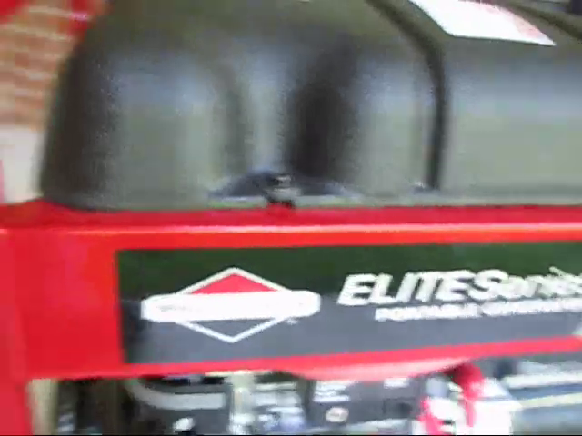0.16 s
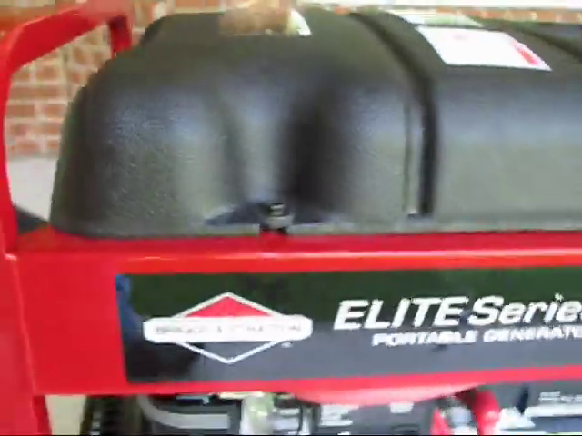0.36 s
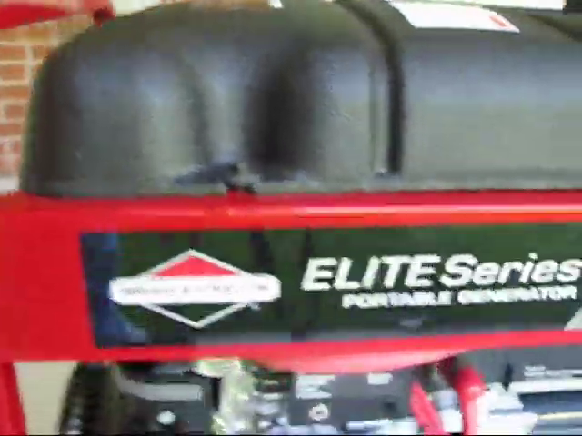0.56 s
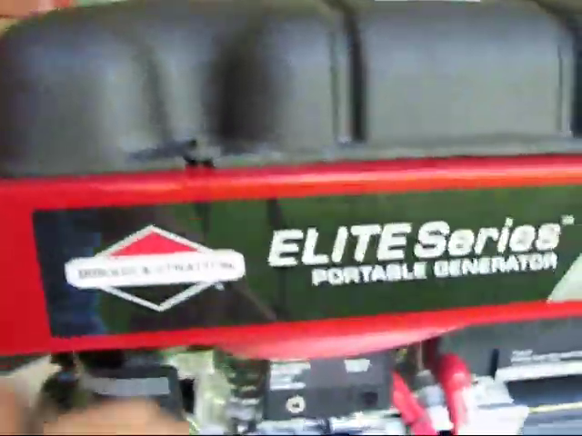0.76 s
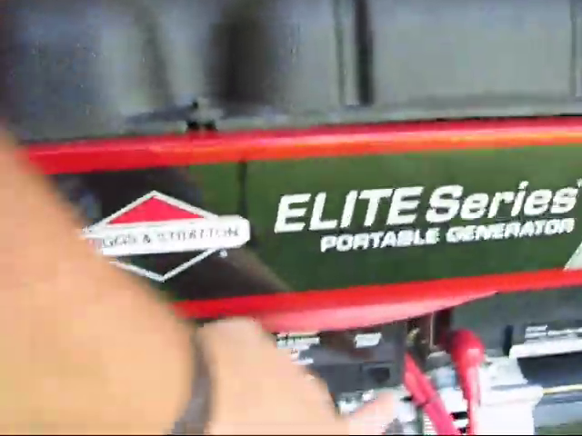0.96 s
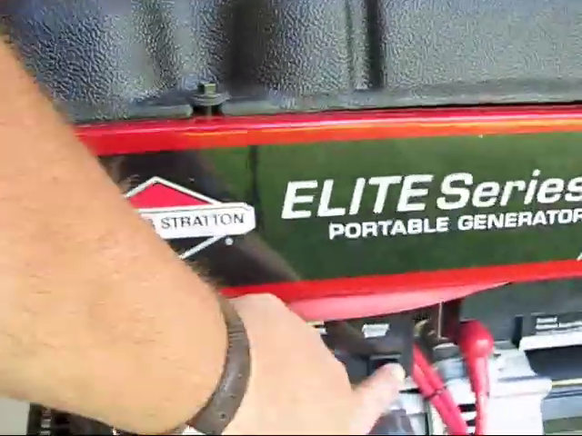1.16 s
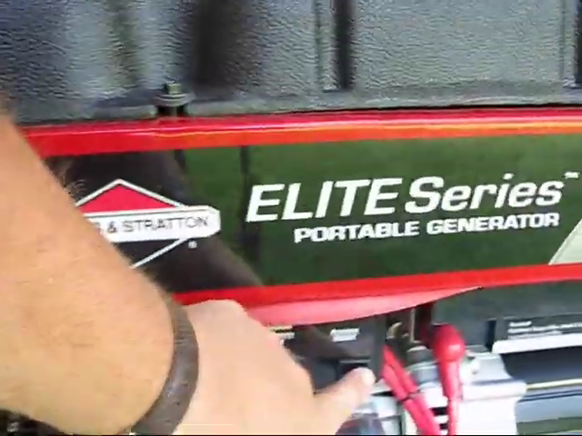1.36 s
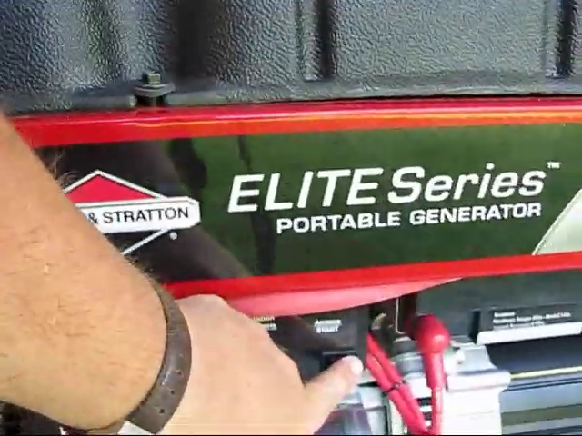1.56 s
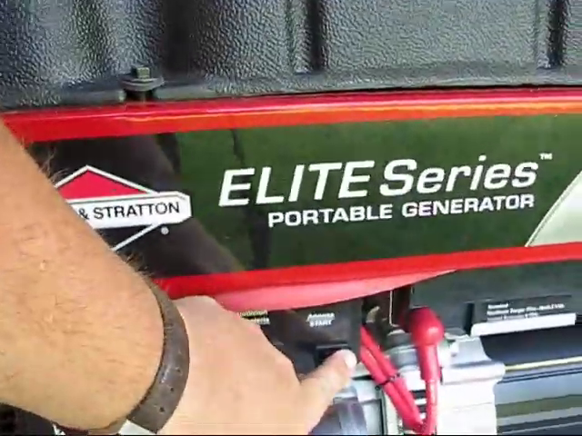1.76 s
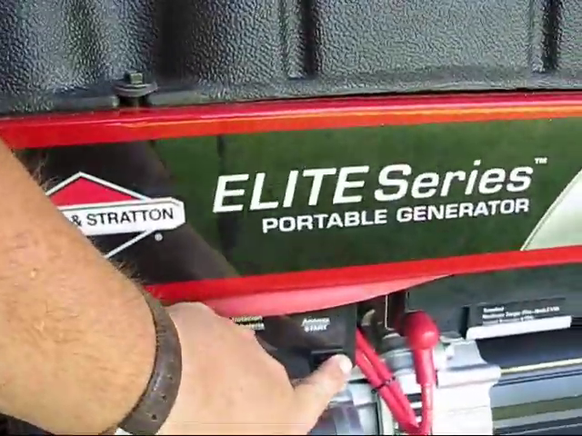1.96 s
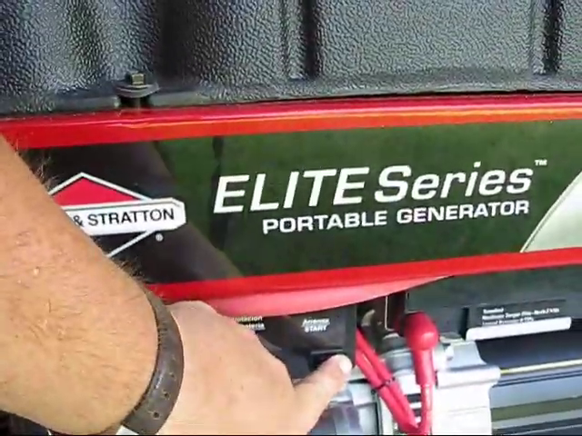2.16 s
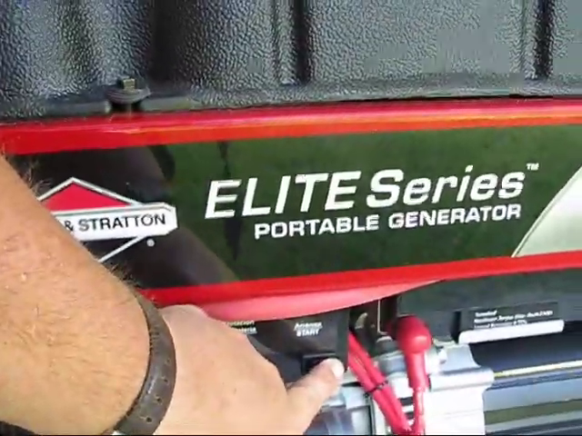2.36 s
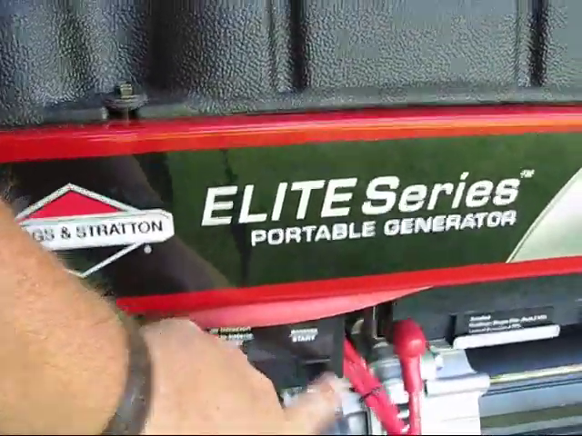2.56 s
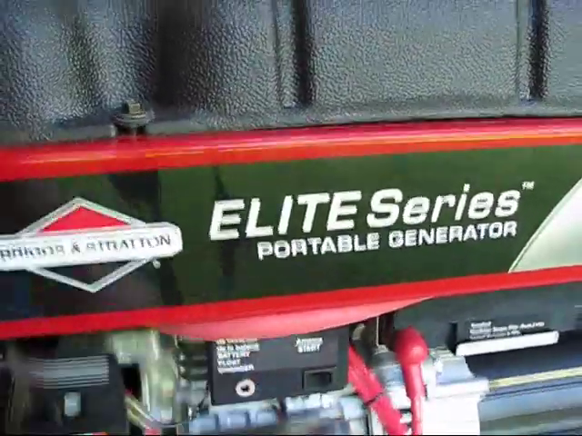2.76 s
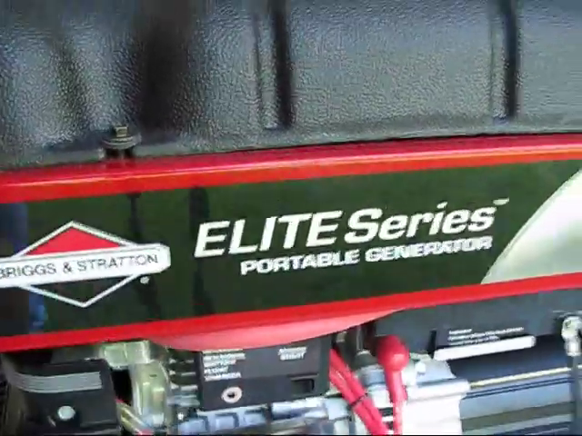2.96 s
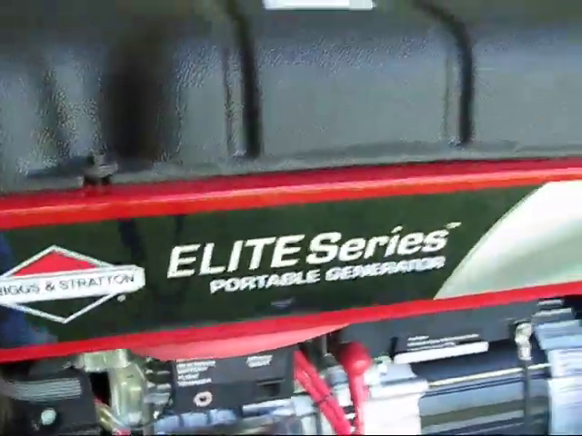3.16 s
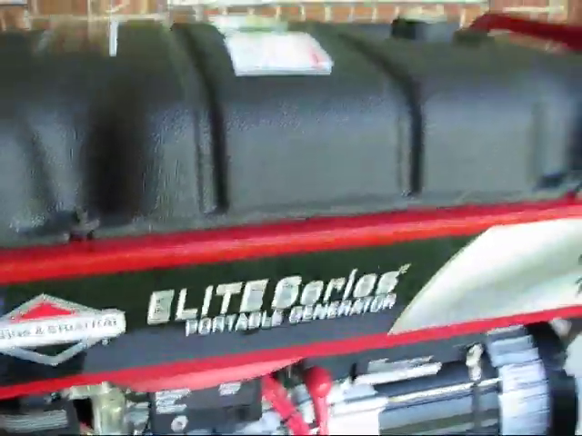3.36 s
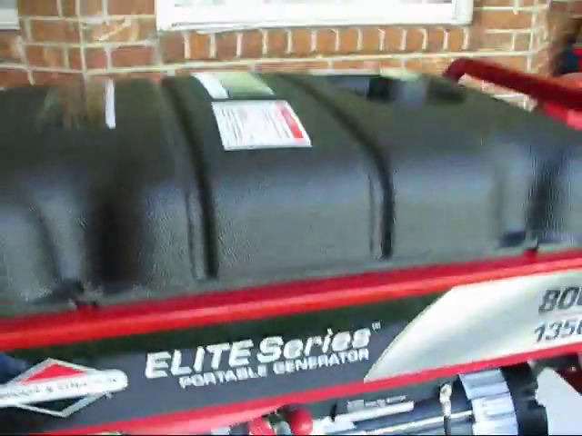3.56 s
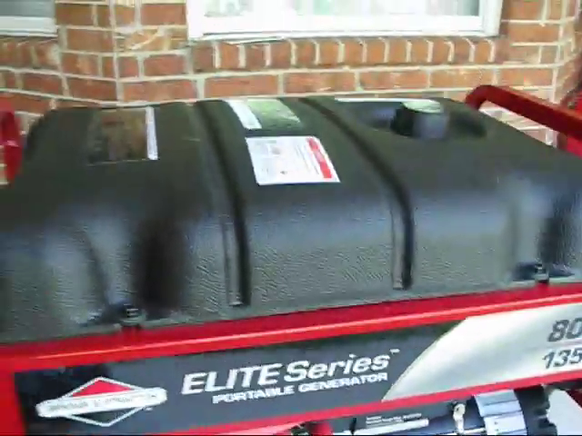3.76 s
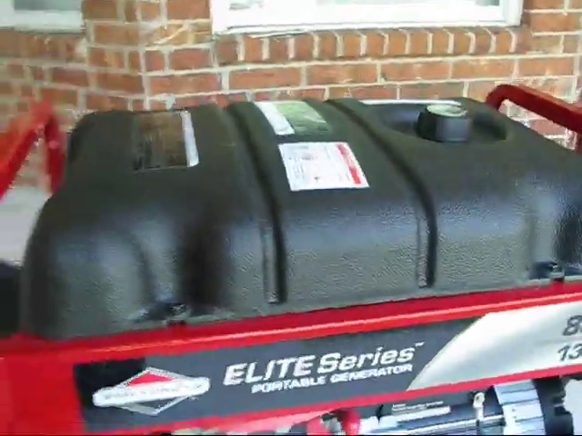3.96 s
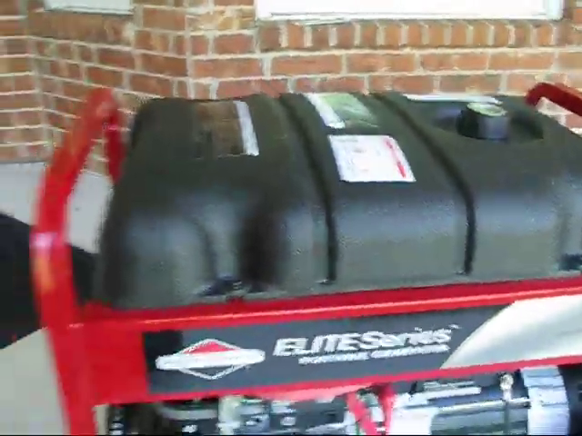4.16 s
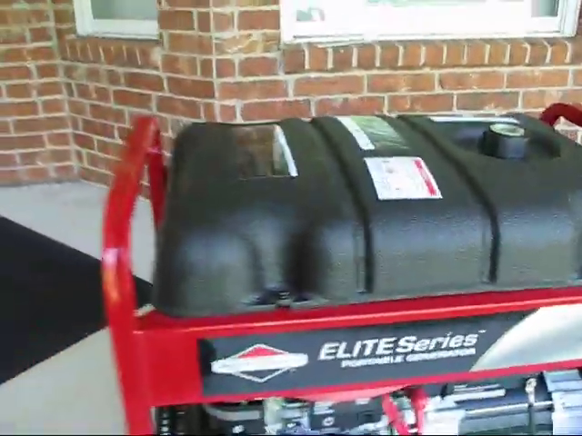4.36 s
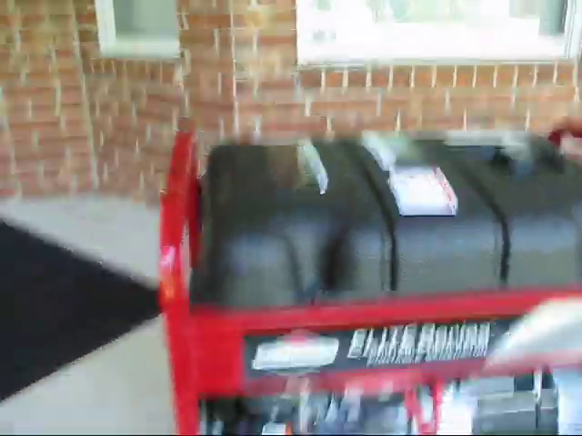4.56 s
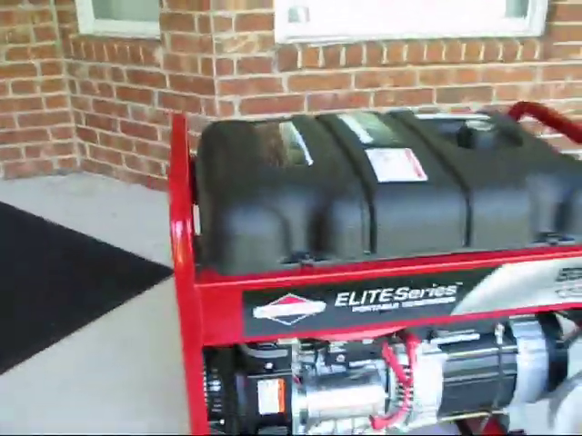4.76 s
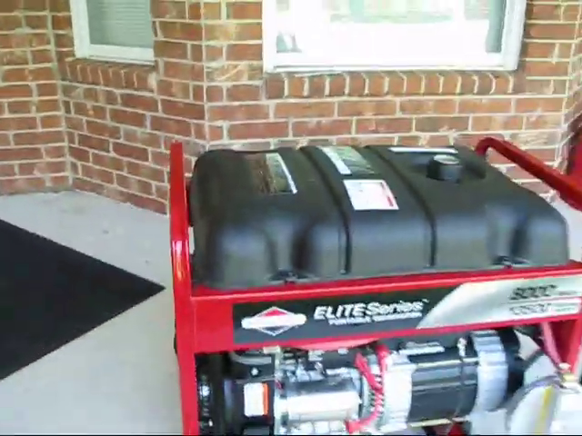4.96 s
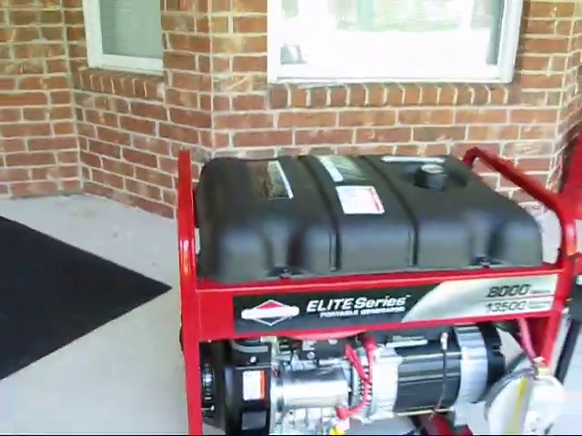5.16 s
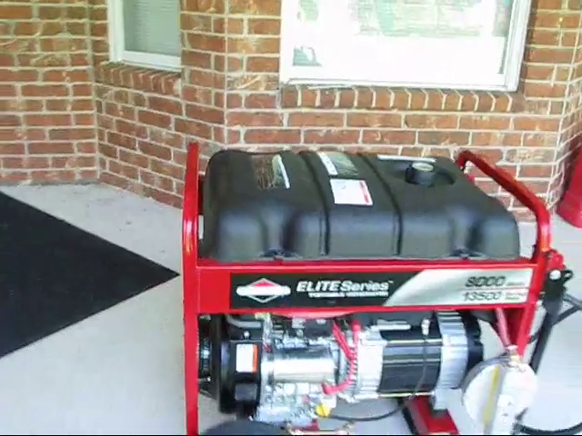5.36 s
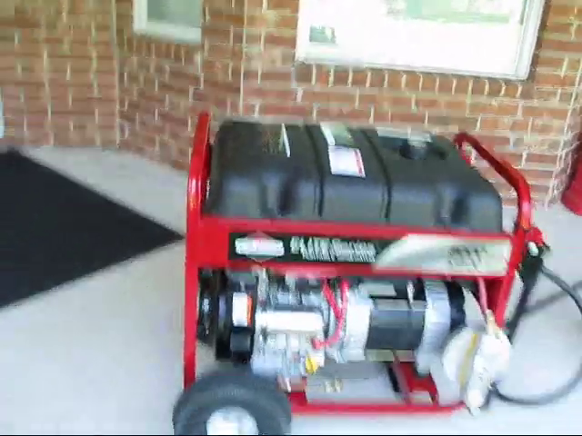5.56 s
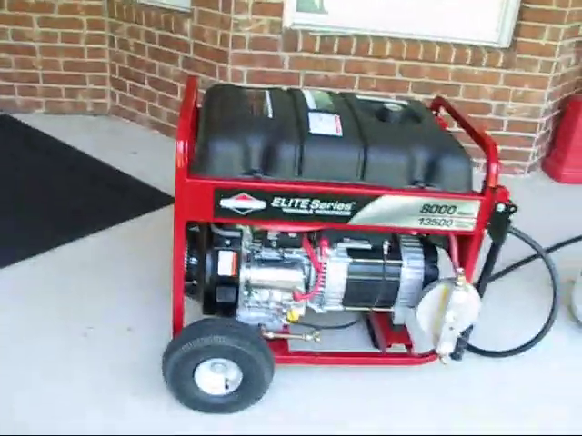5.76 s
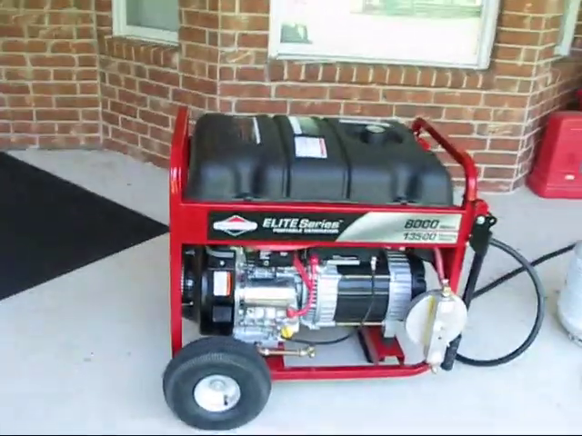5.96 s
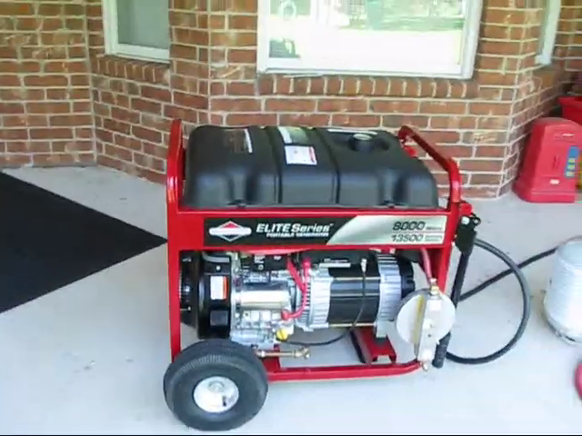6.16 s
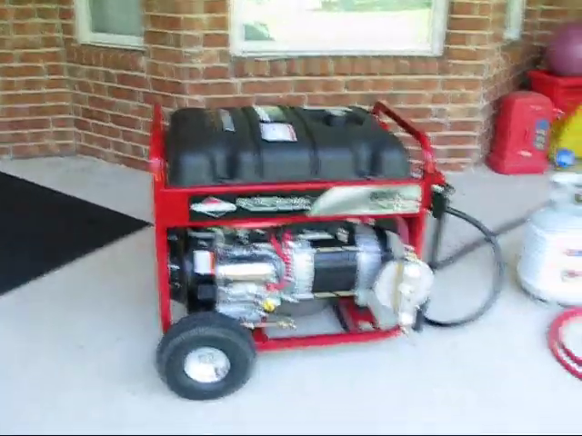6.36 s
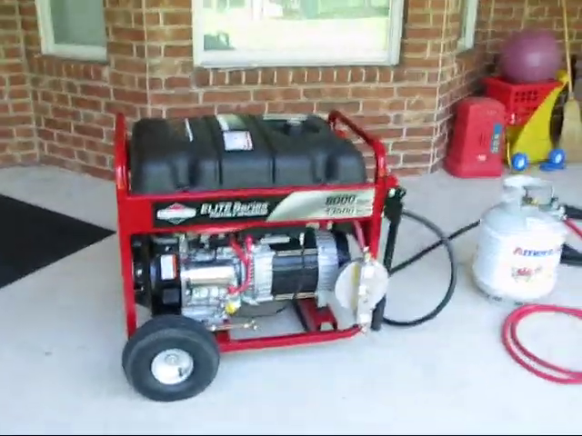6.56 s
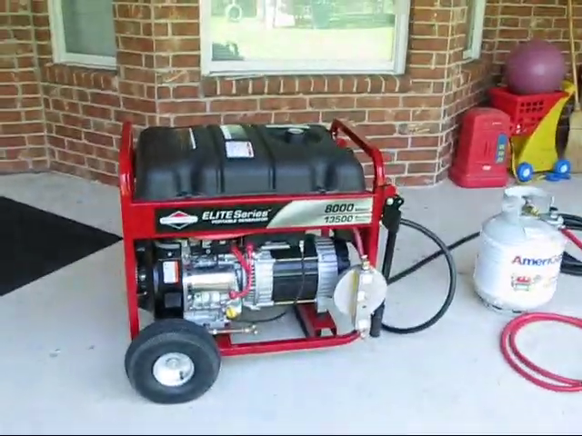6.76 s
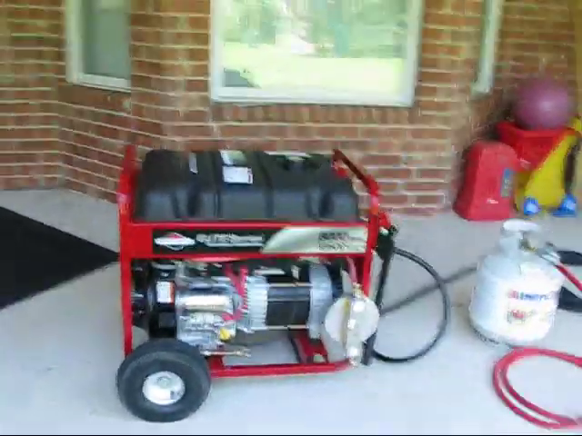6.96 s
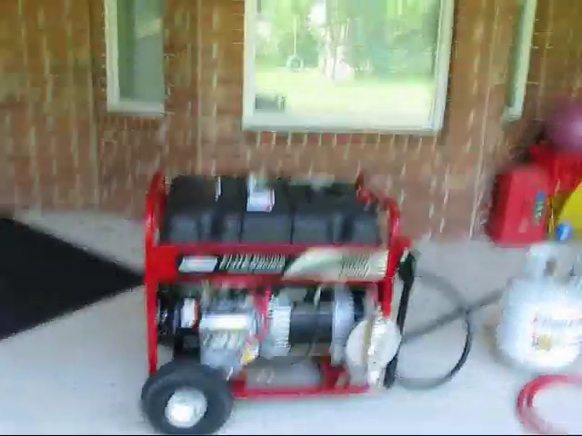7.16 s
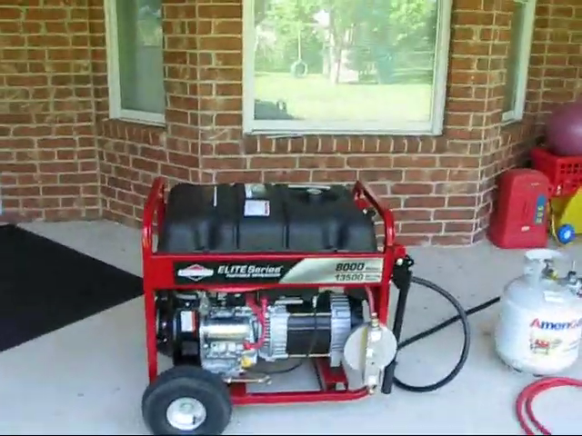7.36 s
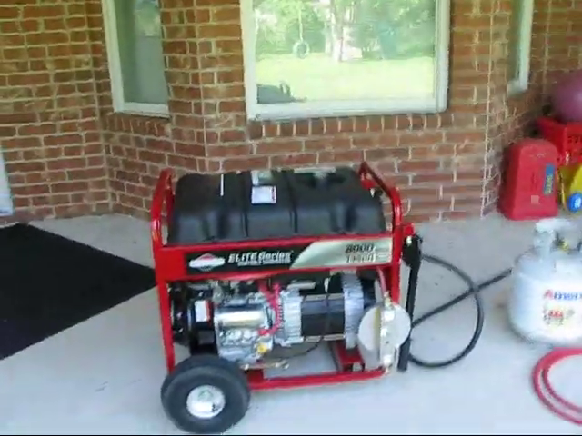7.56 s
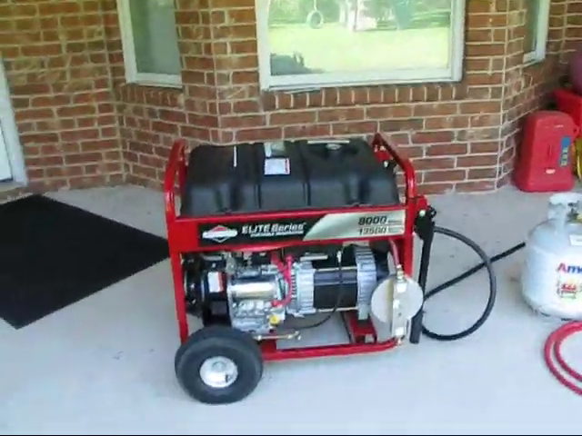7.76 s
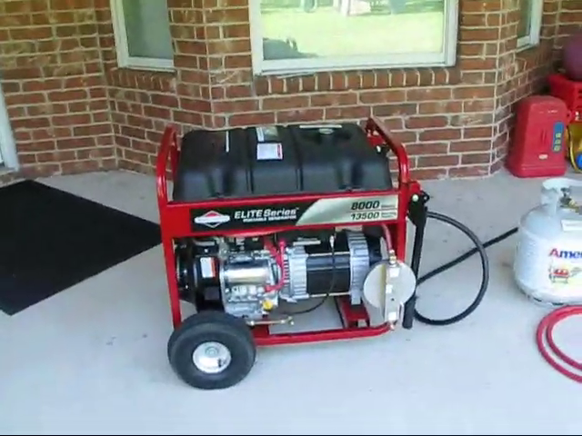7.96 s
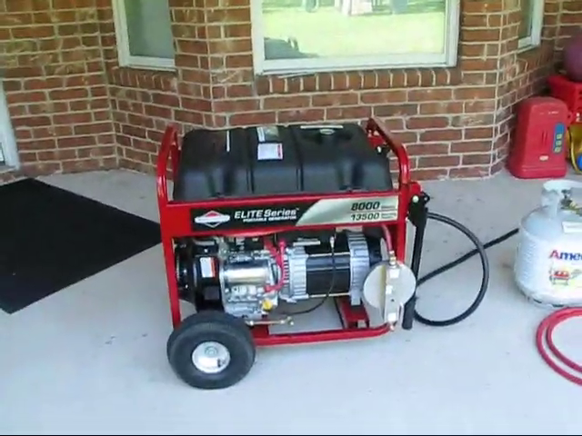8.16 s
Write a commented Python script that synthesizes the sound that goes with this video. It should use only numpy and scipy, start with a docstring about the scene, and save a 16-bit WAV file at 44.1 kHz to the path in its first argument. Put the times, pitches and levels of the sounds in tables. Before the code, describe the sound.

For the first 1.5 seconds there is only low outdoor rumble, faint hum and small ticks near 0.2 and 0.6-0.7 s. Around 1.46 s a light knock precedes a very loud, bright metallic slam at 1.55 s. The starter motor chatters, then its gear whine sweeps upward, gritty and ringing, with low cylinder chuffs, until released near 2.4 s. At about 2.56 s the petrol engine catches, its heavy puffs and casing rattle accelerating in a smooth pitch rise until about 3.4 s. It then settles into a constant, fast drone with valve clatter, fan rush and faint whirr. Low stumbling thumps come at 3.6, 4.0 and 5.5 s, with smaller ones after 6.4 s. Near 3.8 s a hollow tank resonance swells; from 4.2 to 5.6 s the close microphone retreats, with a short brick-porch echo. The engine keeps running to the end at 8 s.

```python
"""Petrol generator start-up on a brick porch

Over a rumbling yard and a faint hum, ticks lead to a solenoid slam built from short ringing bursts.
Starter gears whine upward as phase-driven tooth tones, with noise for chatter and grinding.
A single-cylinder engine catches and runs up to governed speed: filtered puffs merge into a drone of
cycle harmonics over clatter and rattle. It stumbles now and then while the listener backs away."""
import sys
import numpy as np
from scipy import signal
from scipy.fft import rfft, irfft
from scipy.io import wavfile
from scipy.ndimage import uniform_filter1d

SR = 44100
rng = np.random.default_rng(int(sys.argv[2]) if len(sys.argv) > 2 else 0)


def int16_out(signal):
    """Quantize to a 16-bit WAV file."""
    q = np.round(np.clip(np.atleast_2d(signal).T, -1, 1) * 32767)
    wavfile.write(sys.argv[1], SR, q.astype(np.int16))


N = 361619
T = np.arange(N) / SR  # time [s]
TOP_HZ = 15800  # upper limit of the sound

# noise colour of the outdoor rumble: (frequency [Hz], relative level [dB])
YARD_COLOUR = [(15, -27), (25, -12), (119, -9), (204, -14.5), (233, -11.5), (267, -18.5), (297, -17),
               (399, -23.5), (457, -20), (2300, -33), (15500, -57)]
YARD_DB = -34.5  # rumble rms before its swells and the later fade
# hum of a distant machine, before the later fade: (frequency [Hz], rms level [dB])
HUM_TONES = [(64.6, -44), (236.9, -39), (2116, -65)]

# handling ticks, start switch, then solenoid and pinion, before the porch:
# (time [s], peak level [dB], centre frequency [Hz], 60 dB decay time [s])
METAL_KNOCKS = [(0.196, -20, 1700, 0.024), (0.196, -30, 7500, .012), (.585, -38, 8000, 0.1),
                (0.6105, -16, 960, 0.012), (.699, -28.5, 2000, .04), (1.458, -24.5, 2920, .03),
                (1.48, -31, 2900, 0.054), (1.462, -21.5, 418, 0.18), (1.5333, -5.5, 6340, 0.054),
                (1.540, -6, 2520, 0.032), (1.5452, 3, 2300, 0.026), (1.557, -8.5, 6230, 0.078),
                (1.5578, -3.5, 2360, 0.099), (1.569, -6, 1110, .09)]

# starter motor: switched on, nears its free tooth rate ever more slowly, is released and coasts
CRANK_S, RELEASE_S, SPIN_UP_S = 1.54, 2.43, .41
FREE_TOOTH_HZ, COAST_HZ_PER_S = 1670, 1430
TEETH_PER_CYCLE = 198  # starter teeth passing in one engine cycle
# frame resonances that swell the gliding gear tone: (frequency [Hz], width [Hz], peak boost [dB])
FRAME_SWELLS = [(676, 54, 7), (1334, 19, 8)]
# starter housing resonances: (frequency [Hz], width [Hz], relative level [dB])
HOUSING_RINGS = [(1850, 310, 0.5), (2510, 220, -4), (2990, 160, -13), (3400, 140, 6.5), (3990, 150, -3),
                 (4350, 470, -7), (5600, 300, -13), (8460, 500, -11)]
# noise colour of grinding gears: (frequency [Hz], relative level [dB])
GRIND_COLOUR = [(250, -30), (700, -5), (1300, -14), (2500, -5.5), (5500, -10.5), (7000, -16), (11000, -17),
                (15000, -28)]

# chuffs of the cylinder while it is cranked: (share of the cycle [0-1], peak level [dB])
CRANK_CHUFFS = [(.335, -19), (0.662, -18)]
# colour of low gas thumps: (frequency [Hz], relative level [dB])
CRANKCASE_COLOUR = [(25, -28), (55, -13), (80, 8), (110, -7), (170, 0), (300, -10.5), (700, -39.5)]

# engine speed in four-stroke cycles per second: a steady run-up to the governed speed
CATCH_S, CATCH_HZ, RUN_UP_HZ_PER_S, GOVERNED_HZ = 2.563, 10.6, 26.2, 31.215
OVERSHOOT_HZ, OVERSHOOT_S = .5, .2  # peak excess, and its delay after the run-up
# throttle: load left at governed speed [0-1], bend of its closing, smoothing window [s]
IDLE_LOAD, THROTTLE_BEND, THROTTLE_S = 0.087, .6, 0.6
# the listener rises past the fuel tank, then walks back
PAST_TANK_S, PASSING_S = 3.77, 0.23
STEP_BACK_S, WALK_S = 4.21, 1.4  # start and duration

# gas puffs of one engine cycle: (share of the cycle [0-1], relative level [dB])
EXHAUST_PUFFS = [(0.221, -2.5), (0.524, -1.5), (0.879, -5)]
PUFF_SCATTER_DB = 1.2
# colour of the silenced puffs: (frequency [Hz], relative level [dB])
SILENCER_COLOUR = [(20, -14), (45, -5), (80, -2), (130, 0.5), (240, 0.5), (300, 0.5), (420, -21.5),
                   (900, -49)]
# silencer chambers that ring on after each puff: (frequency [Hz], width [Hz], relative level [dB])
CHAMBER_RINGS = [(86, 57, 3.5), (150, 48, -2), (228, 59, 2)]
# drone harmonics: (multiple of the cycle rate [1], relative level beside the engine [dB],
# relative level a few steps back [dB])
DRONE_HARMONICS = [(1, -8.5, -11.5), (2, -5.5, -16.5), (3, -66, -46), (4, -4, -11), (5, 4.5, 2.5),
                   (6, -3, -14.5), (7, -11, -1.5), (8, -19, -2), (9, -2, -12), (10, -2.5, -9),
                   (11, -37, -37), (12, -11.5, -20), (13, -12, -13.5), (14, -11, -32)]
# weak firings, each with a low thump: (time [s], thump peak level [dB])
WEAK_FIRINGS = [(3.589, -6), (4.036, -7), (5.543, -5.5), (6.442, -24.5), (6.665, -11), (7.427, -14),
                (7.486, -12), (7.654, -12), (8.075, -13)]

# colour of engine and starter clatter: (frequency [Hz], relative level [dB])
CLATTER_COLOUR = [(70, -17), (150, -5), (320, -3.5), (480, -3.5), (750, -0.5), (1060, -1.5), (1350, -0.5),
                  (1900, -2.5), (2600, -3), (3600, -11.5), (5000, -14.5), (7000, -26), (15500, -34)]
# gain of the machinery over time, before its trim: (time [s], gain [dB])
MACHINERY_GAIN = [(2.9, -21), (3.43, -21), (3.7, -20), (7.14, -21.5), (7.52, -23), (7.82, -21.5),
                  (8.1, -22)]
# noise colour of the rattling casing: (frequency [Hz], relative level [dB])
RATTLE_COLOUR = [(300, 1), (1200, -3.5), (4000, 1), (7000, -3.5), (10000, -6.5), (15500, -13.5)]
# casing rings under heavy load: (frequency [Hz], half the width of each filter stage [Hz],
# relative level [dB])
CASING_RINGS = [(407, 270, -1), (827, 110, -9), (1282, 41, -2.5), (2590, 130, -4)]
# fan and alternator tones: (multiple of the cycle rate [1], mean peak level before the porch [dB])
WHIRR_TONES = [(24, -42), (42, -34.5), (48, -39), (96, -38.5)]

# stereo spread of the porch: (frequency [Hz], side level relative to mid [dB])
STEREO_WIDTH = [(60, -29), (250, -15), (500, -17), (1000, -12), (2000, -5.5), (4000, -2.5), (8000, 0),
                (15000, -1.5)]


def undb(db):
    """Decibels to amplitude gain."""
    return 10 ** (np.asarray(db) / 20)


def unit(x):
    """Scale to rms 1."""
    return x / np.sqrt(np.mean(x ** 2))


def noise():
    """White noise over the whole scene."""
    return rng.standard_normal(N)


def drift(rate):
    """Smooth random wander with rms 1, taking new values at the given rate [Hz]."""
    k = max(int(SR / rate), 2)
    steps = noise()[np.arange(N) // k]
    return unit(uniform_filter1d(uniform_filter1d(steps, k), k))


def gate(on, off, fade):
    """1 between two times; it rises just after the first and falls just after the second."""
    return np.clip((T - on) / fade, 0, 1) * np.clip((off - T) / fade + 1, 0, 1)


def colour(x, points, size=8192):
    """Causal minimum-phase filter through (frequency [Hz], gain [dB]) points."""
    hz, db = np.transpose(points)
    f = np.maximum(np.fft.rfftfreq(size, 1 / SR), 1)
    gain = undb(np.interp(np.log(f), np.log(hz), db))
    # folding the cepstrum onto positive time puts the energy at the onset
    cepstrum = irfft(np.log(gain))
    cepstrum[1:size // 2] *= 2
    cepstrum[size // 2 + 1:] = 0
    return signal.fftconvolve(x, irfft(np.exp(rfft(cepstrum))))[:len(x)]


def ring(x, hz, width):
    """One resonance, gain 1 at its centre."""
    b, a = signal.iirpeak(min(hz, TOP_HZ), hz / min(width, TOP_HZ), fs=SR)
    return signal.lfilter(b, a, x)


def ring_twice(x, hz, width):
    """The same resonance twice in a row, for steeper skirts."""
    return ring(ring(x, hz, width), hz, width)


def dying_noise(t60, length):
    """Noise burst of the given length [samples] that decays at 60 dB per t60 [s]."""
    return (noise() * undb(-60 * T / t60))[:length]


def clicks(times, sizes):
    """Impulses at the given times [s]."""
    return np.bincount(np.clip(np.asarray(times) * SR, 0, N - 1).astype(int), sizes, N)


def at_angle(turn, share):
    """Times [s] at which the engine passes one point of its cycle."""
    return np.interp(np.arange(int(turn[-1])) + share, turn[turn > 0], T[turn > 0])


def yard(hum_waver_db=0.1, opening_db=1):
    """Coloured noise gives an outdoor rumble, a little louder at first; slow tones hum far off."""
    opening = opening_db * np.clip((1.1 - T) / 0.49, 0, 1)
    swell = undb(.8 * drift(10))
    air = unit(colour(noise(), YARD_COLOUR)) * undb(YARD_DB + opening) * swell
    hum = 0
    for hz, db in HUM_TONES:
        level = np.sqrt(2) * undb(db + hum_waver_db * drift(6.7))
        hum = hum + level * np.sin(2 * np.pi * hz * T + 0.5 * drift(11))
    return air + hum


def knocks(breadth=0.81):
    """Each blow is a short burst of dense metal or plastic ringing round one centre."""
    out = np.zeros(N)
    for s, db, hz, t60 in METAL_KNOCKS:
        burst = dying_noise(t60, SR // 4)
        burst = ring(ring(burst, hz, breadth * hz), hz, 2 * hz)
        start = int(s * SR)
        out[start:start + len(burst)] += undb(db) * burst / np.abs(burst).max()
    return out


def tooth_rate():
    """Starter teeth per second: the motor spins up under power, then coasts down evenly."""
    powered = np.clip(T, CRANK_S, RELEASE_S) - CRANK_S
    spin_up = FREE_TOOTH_HZ * (1 - np.exp(-powered / SPIN_UP_S))
    return np.maximum(spin_up - COAST_HZ_PER_S * np.maximum(T - RELEASE_S, 0), 1)


def starter(mesh_db=-17.0, chatter_db=-20, easing_db=-7, whine_db=-14, grind_db=-24, grind_power=1.25,
            coast_db_per_s=-45, chatter_speed_db=-5, frame_t60=0.29):
    """Uneven teeth mesh and ring the housing; with speed blows ease while whine and grinding grow."""
    tooth_hz = tooth_rate()
    speed = tooth_hz / FREE_TOOTH_HZ
    teeth = 2 * np.pi * np.cumsum(tooth_hz * (1 + .013 * drift(70))) / SR + .14 * drift(600)
    # the pinion runs out of true, which puts sidebands beside each line
    wobble = np.sin(teeth / 9 + drift(40))
    # slow teeth rattle in their play before they pull into a tone
    seated = np.clip((tooth_hz - 360) / 200, .1, 1)
    contact = (1 + .7 * np.cos(teeth)) * undb(2.2 * drift(200))
    # the pinion withdraws, leaving the flywheel to coast and clatter
    pulling = gate(CRANK_S, RELEASE_S, .05)
    chatter = unit(colour(noise() * contact, CLATTER_COLOUR)) * (1 - .7 * seated * pulling)

    mesh = np.sin(teeth + .8 * wobble) * undb(3 * drift(200))
    slow_octave = np.sin(2 * teeth + wobble) * np.clip(1 - tooth_hz / 1200, 0, 1)
    mesh = (mesh + .8 * slow_octave) * pulling
    swell_db = sum(db / (1 + (2 * (tooth_hz - hz) / width) ** 2) for hz, width, db in FRAME_SWELLS)

    # faster teeth strike more sharply, which brightens the whine
    strikes = 0
    for k in np.arange(2, 11):
        level = undb(3 * drift(120) + 1.2 * drift(18)) / k ** (1.7 - 1.3 * speed)
        strikes = strikes + level * np.sin(k * (teeth + .2 * wobble))
    strikes = strikes * seated * gate(CRANK_S, RELEASE_S, .06)
    housing = 0
    for hz, width, db in HOUSING_RINGS:
        housing = housing + undb(db) * ring(strikes + .8 * speed * noise() * contact, hz, width)
    whine = housing + .22 * ring_twice(strikes, 2800, 4500)

    gears = mesh * seated * undb(mesh_db + easing_db * speed + swell_db) + whine * undb(whine_db)
    # the steel frame holds each tone briefly, so the gliding lines beat against themselves
    frame = dying_noise(frame_t60, SR // 5)
    held = signal.oaconvolve(gears, frame / np.linalg.norm(frame))[:N]
    gears = .87 * gears + .5 * held

    grind = unit(colour(noise() * contact, GRIND_COLOUR)) * (1 + pulling) / 2 * speed ** grind_power
    chatter = chatter * undb(chatter_db + chatter_speed_db * speed)
    coasting = undb(coast_db_per_s * np.maximum(T - RELEASE_S, 0))
    turning = gate(CRANK_S, CATCH_S, 0.046) * coasting
    return turning * (gears + chatter + grind * undb(grind_db))


def thumps(table):
    """Single low gas puffs: coloured impulses at their peak levels."""
    s, db = np.transpose(table)
    one_peak = np.abs(colour(clicks([0], [1]), CRANKCASE_COLOUR)).max()
    return colour(clicks(s, undb(db)), CRANKCASE_COLOUR) / one_peak


def chuffs():
    """The cranked cylinder pumps air twice a cycle until it fires."""
    turn = np.cumsum(tooth_rate()) / SR / TEETH_PER_CYCLE
    puffs = []
    for share, db in CRANK_CHUFFS:
        puffs += [(s, db) for s in at_angle(turn, share) if s < CATCH_S]
    return thumps(puffs)


def engine_hz():
    """Cycle rate: a straight run-up, a slight overshoot, then the governed speed."""
    governed_s = CATCH_S + (GOVERNED_HZ - CATCH_HZ) / RUN_UP_HZ_PER_S
    run_up = np.interp(T, [CATCH_S, governed_s], [CATCH_HZ, GOVERNED_HZ])
    since = np.maximum(T - governed_s, 0) / OVERSHOOT_S
    return run_up + OVERSHOOT_HZ * since * np.exp(1 - since)


def engine_load():
    """The governor closes the throttle as the missing speed is made up; load runs 0-1."""
    missing = np.clip((GOVERNED_HZ - engine_hz()) / (GOVERNED_HZ - CATCH_HZ), 0, 1)
    throttle = uniform_filter1d(missing ** THROTTLE_BEND, int(THROTTLE_S * SR))
    return np.clip(IDLE_LOAD + (1 - IDLE_LOAD) * throttle, 0, 1)


def retreat():
    """Share of the walk back, 0-1."""
    return np.clip((T - STEP_BACK_S) / WALK_S, 0, 1)


def exhaust(turn, weak, puffs_db=-6.0, speed_power=2.08, load_power=1.62, puffs_far_db=-14,
            drone_db=-19, drone_load_db=-27, drone_far_db=4.0, spread=0.1308, waver_db=1.0,
            stumble_dip=0.2):
    """Puffs, stronger with speed and load, give way to a harmonic drone as the throttle closes."""
    load, far = engine_load(), retreat()
    puffs = 0
    for share, db in EXHAUST_PUFFS:
        s = at_angle(turn, share)
        puffs = puffs + clicks(s, undb(db + PUFF_SCATTER_DB * rng.standard_normal(len(s))))
    puffs = colour(puffs, SILENCER_COLOUR)
    puffs = puffs + sum(undb(db) * ring(puffs, hz, width) for hz, width, db in CHAMBER_RINGS)
    puffs = unit(puffs) * (engine_hz() / GOVERNED_HZ) ** speed_power * load ** load_power

    drone = 0
    for k, near_db, far_db in DRONE_HARMONICS:
        # the walls favour other harmonics at each spot, and smear each puff over the whole cycle
        gain = undb(near_db + far * (far_db - near_db) + waver_db * drift(19))
        drone = drone + gain * np.cos(2 * np.pi * k * turn - np.pi * spread * k ** 2)
    drone = unit(drone) * (1 - stumble_dip * weak)

    puffs = puffs * undb(puffs_db + puffs_far_db * far)
    return puffs + drone * undb(drone_db + drone_load_db * load + drone_far_db * far)


def valve_gear(turn, slack_s=.00016, scatter_db=4, count=9):
    """Valve gear and piston parts each knock at their own point of every cycle, with slack and scatter."""
    blows = 0
    for share in (np.arange(count) + rng.random(count)) / count:
        s = at_angle(turn, share)
        late, size = rng.standard_normal((len(s), 2)).T
        part = dying_noise(0.037, SR // 20)  # each part rings in its own way
        hits = clicks(s + slack_s * late, undb(scatter_db * size))
        blows = blows + signal.oaconvolve(hits, part)[:N]
    return unit(ring(colour(blows, CLATTER_COLOUR), 670, 8400))


def whirr(turn):
    """Fan and alternator sing at multiples of the cycle rate, wavering in level and phase."""
    tones = 0
    for k, db in WHIRR_TONES:
        level = undb(db + 1.9 * drift(11))
        tones = tones + level * np.sin(2 * np.pi * k * turn + 0.6 * drift(25))
    return tones


def machinery(turn, weak, clatter_db=-1.8, knock_db=-3, fan_db=1.0, rattle_db=0.64, shade_db=-4.0,
              tank_db=-11, tank_near_db=6, tank_far_db=-8, bark_db=-3, burn=0.33, idle_rattle=0.55):
    """Valve gear knocks and the fan rushes, ringing the tank; each firing rattles the casing."""
    load = engine_load()
    gear = valve_gear(turn)
    fan = unit(colour(noise(), CLATTER_COLOUR)) * undb(0.5 * drift(14))

    # the harder the engine pulls, the more each burn stands out
    cycle = turn % 1
    firing = np.exp(-cycle / burn) * np.minimum(cycle / (0.023 + 0.092 * (1 - load) ** 2), 1)
    flicker = undb(0.84 * drift(400) + drift(15) - 3.1 * weak)
    rattle = unit(colour(noise(), RATTLE_COLOUR))
    rattle = rattle * (idle_rattle + (0.14 + 1.24 * load) * firing) * flicker

    shake = noise() * (.5 + firing)
    casing = sum(undb(db) * unit(ring_twice(shake, hz, 2 * width)) for hz, width, db in CASING_RINGS)
    bark = load ** 0.67 * casing
    tank = unit(ring_twice(gear + fan, 774, 330))

    body = undb(knock_db) * gear + undb(fan_db) * fan * (1 - load / 2) + undb(bark_db) * bark
    # close above the tank its ring is strong and it shades the rattle below
    above = np.exp(-((T - PAST_TANK_S) / PASSING_S) ** 2)
    body = body + undb(rattle_db + shade_db * above) * rattle
    body = body + undb(tank_db + tank_near_db * above + tank_far_db * retreat()) * tank
    level_db = np.interp(T, *np.transpose(MACHINERY_GAIN))
    return body * undb(level_db + clatter_db) + whirr(turn)


def porch(x, t60=0.5, wet_db=-11, scatter_hz=90):
    """Brick walls add a short tail; scattered sound reaches left and right differently."""
    tail = dying_noise(t60, SR // 2)
    echo = ring(signal.fftconvolve(x, tail / np.linalg.norm(tail))[:N], 1100, 13000)
    mid = (x + undb(wet_db) * echo) / np.sqrt(1 + undb(2 * wet_db))
    side = colour(mid * np.sqrt(2) * np.sin(2.56 * drift(scatter_hz)), STEREO_WIDTH)
    return np.array([mid + side, mid - side])


def scene(background_drop_db=-13):
    """Quiet yard and ticks, starter, then the running engine with its exhaust in the centre."""
    turn = np.cumsum(engine_hz() * (T >= CATCH_S)) / SR  # engine cycles so far
    # the engine's sound fades in around the moment it catches
    running = gate(CATCH_S - .03, T[-1], .045)
    weak = sum(np.exp(-((T - s) / 0.014) ** 2) for s, _ in WEAK_FIRINGS)
    # the background drops away as the starter is switched on
    background = yard() * undb(background_drop_db * gate(CRANK_S, T[-1], 0.036))
    gas = running * exhaust(turn, weak) + chuffs() + thumps(WEAK_FIRINGS)
    return gas + porch(background + knocks() + starter() + running * machinery(turn, weak))


def record(dry):
    """Peaks clip at full scale, then a steep low-pass cuts the top."""
    low_pass = signal.ellip(10, .2, 80, TOP_HZ, fs=SR, output="sos")
    return signal.sosfilt(low_pass, np.clip(dry, -1, 1))


dry = scene()
out = record(dry)
int16_out(out)
```